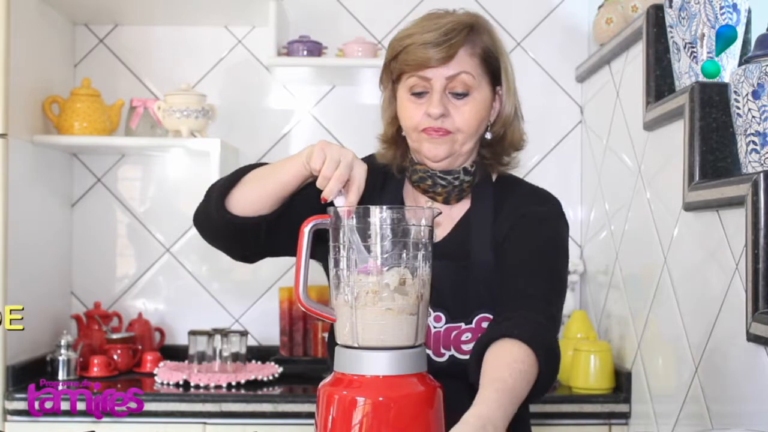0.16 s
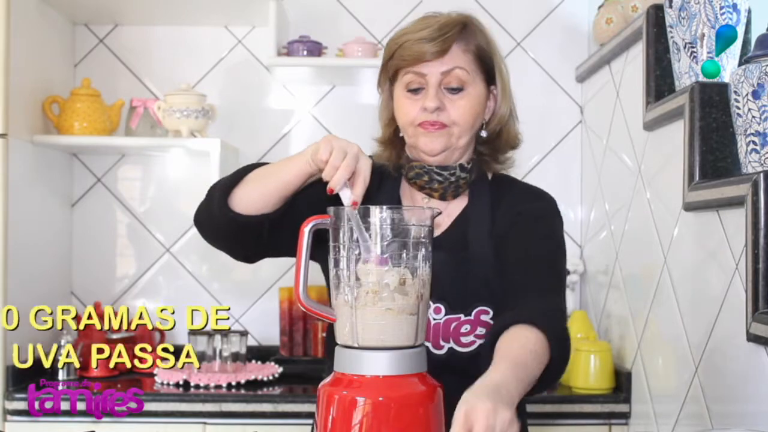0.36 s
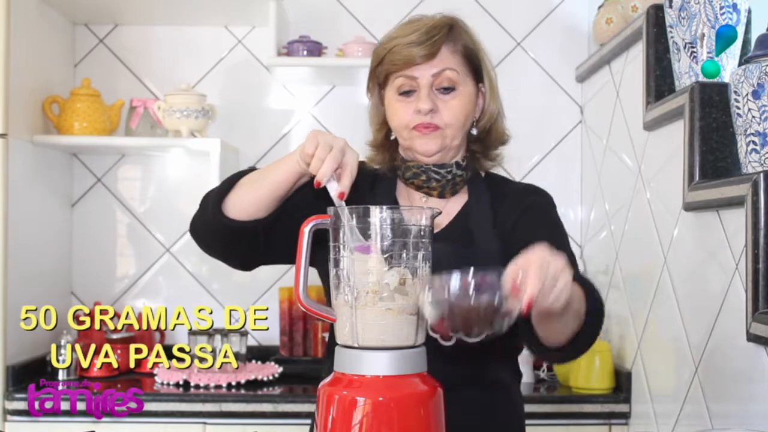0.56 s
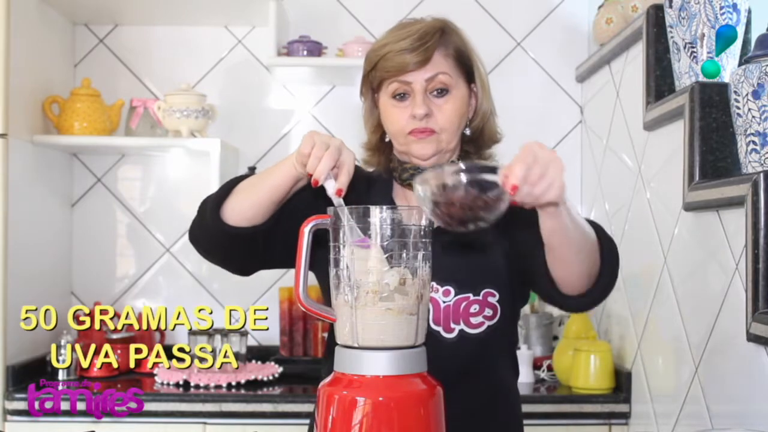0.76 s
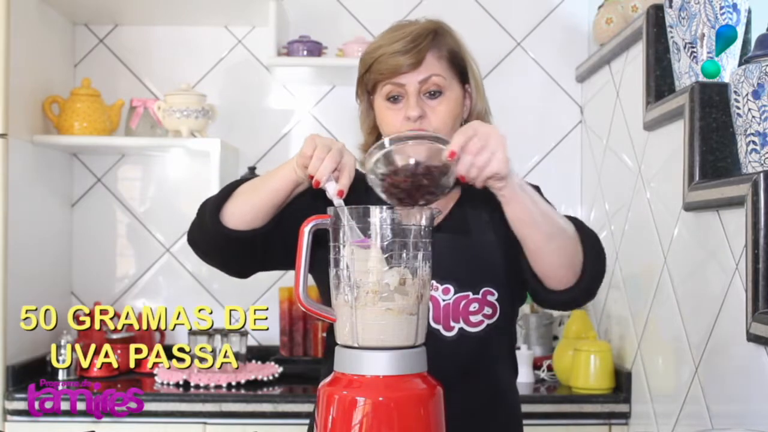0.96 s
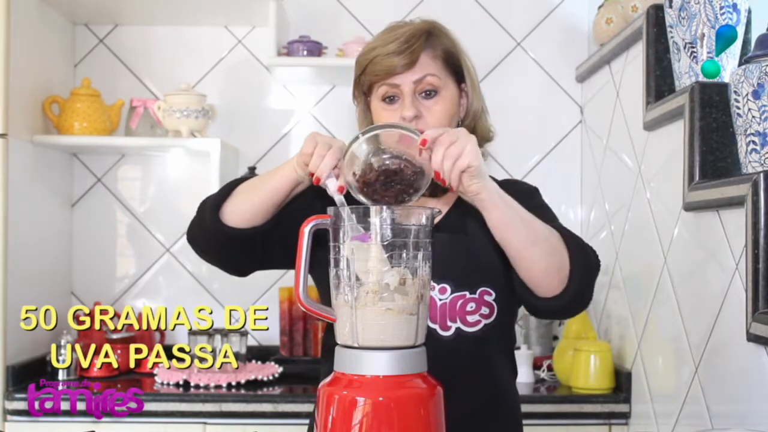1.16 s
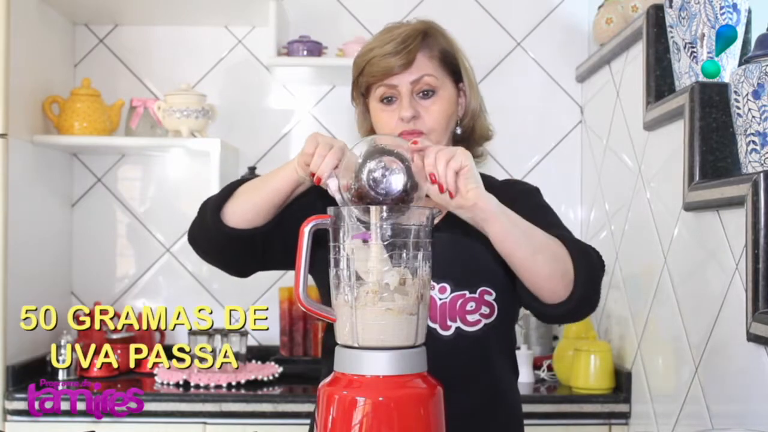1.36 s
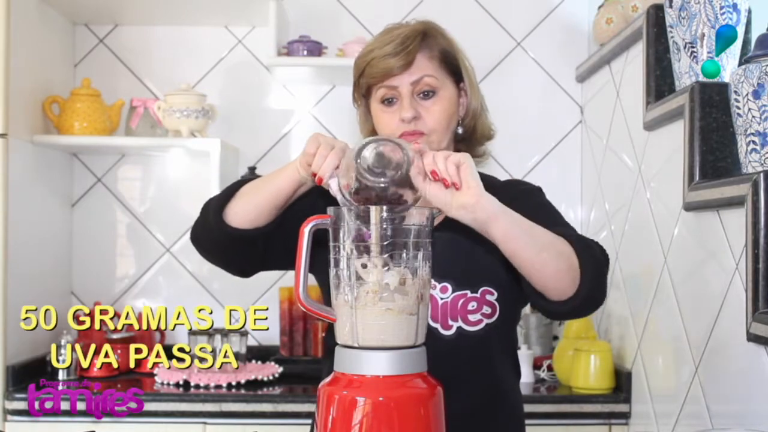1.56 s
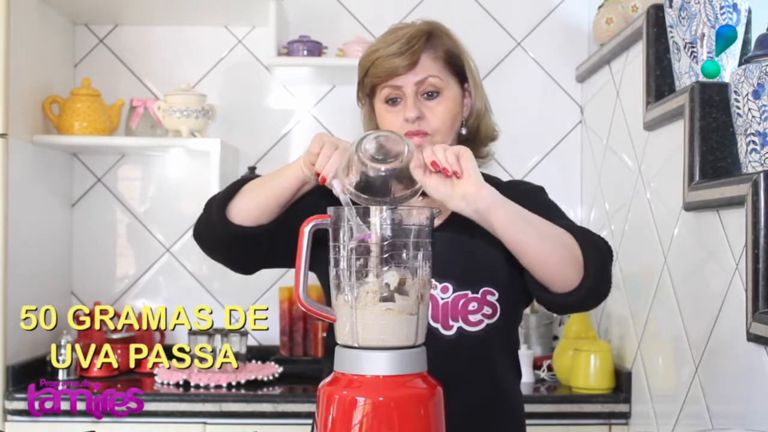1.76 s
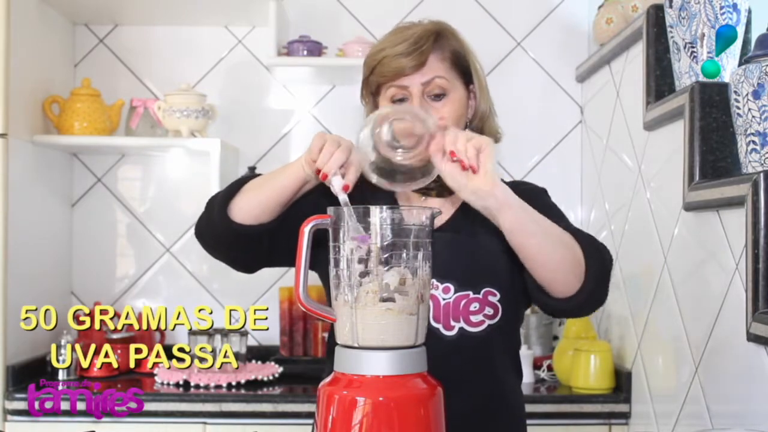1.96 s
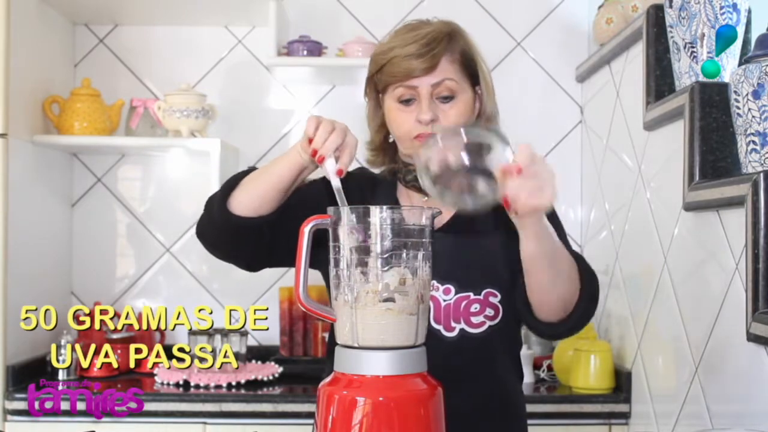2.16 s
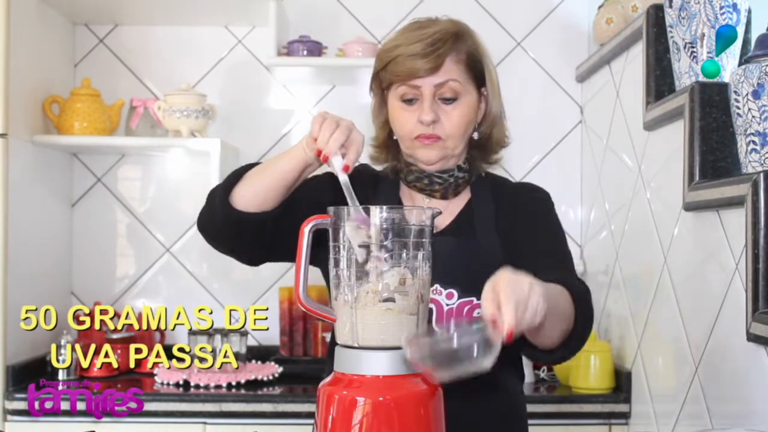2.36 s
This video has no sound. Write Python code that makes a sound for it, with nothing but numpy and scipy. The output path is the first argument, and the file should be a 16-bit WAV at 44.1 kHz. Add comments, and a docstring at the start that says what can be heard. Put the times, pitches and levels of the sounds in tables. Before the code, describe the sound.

A small glass bowl scrapes off a stone counter, then thick batter is stirred.

```python
"""A tiled kitchen, one microphone close to a stone counter, quiet room noise throughout.
A hand brushes faintly; at 0.2 s a small glass bowl is dragged off the counter, its slipping foot
ringing the glass, and at 0.6 s it clinks once in the hand. From 1 s a spatula scrapes down a plastic
blender jar and thick batter flops inside with hollow thuds; now and then a falling raisin or the
spatula ticks against the jar. The batter is stirred softly, and at 1.8 s the jar rocks once."""
import sys
import numpy as np
from scipy import signal
from scipy.fft import rfft, irfft, next_fast_len
from scipy.io import wavfile
from scipy.ndimage import uniform_filter1d

SR = 44100
rng = np.random.default_rng(int(sys.argv[2]) if len(sys.argv) > 2 else 0)


def pcm_store(signal):
    """Save signal as 16-bit PCM."""
    levels = np.round(np.clip(np.atleast_2d(signal), -1, 1) * 32767)
    wavfile.write(sys.argv[1], SR, levels.astype(np.int16).T)


N = 105840
TIME = np.arange(N) / SR
HIT_SAMPLES = 441  # 10 ms


# how hard the bowl rubs on the counter: (time [s], level [dB])
DRAG_LEVEL = [(.215, -79), (.223, -31.5), (.236, -22.5), (.246, -11), (.274, -15.5), (.288, -13),
              (.315, -18), (.355, -25), (.385, -31), (.408, -28.5), (.426, -34), (.445, -56.5)]
# resonances of the bowl on the stone: (frequency [Hz], width [Hz], level [dB])
BOWL_MODES = [(569, 50, -7), (673, 35, 0), (828, 20, -0.5), (930, 62, -3), (1127, 35, -3.5), (1303, 39, -3),
              (1420, 76, -0.5), (1603, 46, 2), (2026, 45, -1.5), (2540, 34, -7.5), (2824, 8, -7.5),
              (3060, 60, -16.5), (3940, 230, -18.5)]
# friction of glass on stone: (frequency [Hz], density [dB])
FRICTION_SPECTRUM = [(100, -35.5), (250, -20.5), (550, 2), (1600, -1), (2400, -1.5), (3300, -11.5),
                     (4500, -22.5), (5700, -31.5), (7200, -48), (15000, -56)]
# dull rumble of the counter: (frequency [Hz], density [dB])
COUNTER_SPECTRUM = [(90, -20), (140, -5.5), (240, 4), (420, 2), (1500, -45)]
# the bowl's foot catches: (time [s], level [dB], pitch [Hz], t60 [s])
FOOT_CATCHES = [(.2175, -35.5, 2010, 0.031), (.2242, -30.5, 1760, 0.0063), (.2822, -20, 2230, 0.0081),
                (.2855, -19, 1990, 0.0039), (0.359, -23, 1387, .04)]
SLIPS_PER_S, SLIP_SPREAD_DB = 2200, -1

def bowl_drag():
    """Dense slips of the foot ring the glass and shake the counter; a few catches stand out."""
    force, rub = (grains(SLIPS_PER_S, SLIP_SPREAD_DB) * stroke(DRAG_LEVEL) for _ in range(2))
    glass = from_db(-2.5) * driven(resonate, force, BOWL_MODES)
    friction = from_db(-6.5) * driven(coloured, rub, FRICTION_SPECTRUM)
    counter = from_db(-20.5) * delayed(driven(coloured, force, COUNTER_SPECTRUM), .012)
    catches = sum(from_db(db) * delayed(ping(hz, t60, attack_s=.00034), s)
                  for s, db, hz, t60 in FOOT_CATCHES)
    return filtered(glass + friction + catches + counter, "low", hz=5530, order=4)


# gritty treble of the drag: (time [s], level [dB])
GRIT_LEVEL = [(.22, -92), (.226, -52), (.232, -49.5), (.236, -33), (.255, -34), (.272, -49), (.315, -49.5),
              (.345, -72)]
# upper resonances of the glass: (frequency [Hz], width [Hz], level [dB])
GLASS_MODES = [(3600, 550, 1.5), (4620, 780, -2), (10190, 400, 2), (13300, 300, -12.5), (15290, 200, -4)]
# thin squeals of the foot: (time [s], length [s], level [dB])
FOOT_SQUEALS = [(0.256, .046, -43), (0.318, 0.037, -51.5)]

def bowl_grit():
    """Grit under the foot rasps in the upper resonances of the glass, with two thin squeals."""
    force = grains(SLIPS_PER_S, SLIP_SPREAD_DB) * stroke(GRIT_LEVEL)
    rasp = driven(resonate, force, GLASS_MODES)
    squeal_gain = sum(from_db(db) * swell(s, length) for s, length, db in FOOT_SQUEALS)
    return rasp + squeal_gain * narrow_noise(hz=6310, width_hz=230)


# how hard the batter is stirred: (time [s], level [dB])
STIR_LEVEL = [(1.015, -74), (1.035, -23), (1.09, -20), (1.24, -37.5), (1.3, -44), (1.5, -61.5),
              (1.67, -58.5), (1.75, -49), (1.86, -53.5), (1.98, -62)]
# wet squelch of the batter: (frequency [Hz], density [dB])
SQUELCH_SPECTRUM = [(90, -32.5), (200, -3), (400, 5), (570, -2.5), (760, -13), (2000, -31.5), (9000, -85)]
# low modes of the filled jar: (frequency [Hz], t60 [s], level [dB])
JAR_MODES = [(165, 0.12, 1), (242.1, 0.26, 6), (346.6, 0.31, -4), (387, 0.12, 0.5), (468.6, .08, 1.5),
             (549.7, .16, 2.5), (638, .12, -2.5)]
# lumps flop in the jar: (time [s], level [dB], pitch [Hz])
BATTER_THUDS = [(1.027, -29.5, 553), (1.035, -22.5, 238), (1.0475, -23, 572), (1.057, -19.5, 521),
                (1.072, -14.5, 259), (1.109, -16.5, 262), (1.159, -27.5, 227), (1.184, -24.5, 256),
                (1.207, -25.5, 232), (1.2204, -22.5, 484), (1.222, -25.5, 261), (1.2334, -28, 346),
                (1.263, -34, 400), (1.3302, -28.5, 391), (1.343, -31, 313), (1.778, -45.5, 436),
                (1.8123, -38, 466), (1.838, -43, 412)]

def batter():
    """Each lump plops at its own pitch and wakes the jar's low modes; small squelches ring it too."""
    force = grains(per_s=380, spread_db=-1.5) * stroke(STIR_LEVEL)
    stirred_jar = rms_one(signal.fftconvolve(force, struck(JAR_MODES))[:N])
    ringing = from_db(-5.5) * np.std(force) * stirred_jar
    for s, db, hz in BATTER_THUDS:
        plop = ping(hz, t60=.052, attack_s=.0016)
        hollow = struck(JAR_MODES, extra_db=-10 * (octaves_from(hz, JAR_MODES) / .8) ** 2)
        ringing = ringing + from_db(db) * delayed(plop + from_db(-5.5) * hollow, s)
    squelch = from_db(-4.5) * driven(coloured, force, SQUELCH_SPECTRUM)
    return filtered(ringing, "band", hz=[170, 700], order=4) + squelch


# the spatula's stroke down the wall: (time [s], level [dB])
SWEEP_LEVEL = [(1.015, -86), (1.02, -36.5), (1.036, -27), (1.053, -24), (1.08, -29.5), (1.096, -34),
               (1.105, -42), (1.2, -56.5)]
# batter smeared on plastic: (frequency [Hz], density [dB])
SMEAR_SPECTRUM = [(150, -23), (400, -10), (620, 9), (800, -5), (1250, -9.5), (1550, -1), (1750, -11.5),
                  (2400, -7.5), (3200, -13.5), (5500, -17), (9000, -23), (13000, -29), (16000, -54)]
# thin singing of the scraped wall: (frequency [Hz], width [Hz], level [dB])
WALL_SONG_MODES = [(920, 7.5, 0), (5520, 8.7, -4), (5600, 8.3, 0), (5840, 14, 1)]

def spatula_sweep():
    """Fine wet crackle as the blade smears batter down the wall, which rings on thinly."""
    force = grains(per_s=5400, spread_db=2) * stroke(SWEEP_LEVEL)
    smear = driven(coloured, force, SMEAR_SPECTRUM)
    return smear + from_db(-23.5) * driven(resonate, force, WALL_SONG_MODES)


# a falling raisin or the spatula ticks against the jar:
# (time [s], level [dB], favoured frequency [Hz], emphasis [dB])
JAR_TICKS = [(.996, -44, 4080, 7.5), (1.22, -42.5, 1500, 23), (1.3296, -45, 1650, 8),
             (1.7128, -61.5, 2400, 7), (1.8104, -48.5, 9800, 14), (1.8408, -53, 3730, 19)]
# modes of the plastic wall: (frequency [Hz], t60 [s], level [dB])
WALL_MODES = [(1030, .035, -6), (1575, 0.044, 1.5), (2316, 0.022, -1), (3837, 0.019, -0.5),
              (4190, 0.04, -8.5), (5710, .02, -6.5), (6630, .012, 0.5), (7800, 0.011, -4),
              (10050, .022, -4.5)]

def jar_ticks():
    """Each hit is a crack plus the wall's modes; the stronger the emphasis, the purer the tick."""
    ticks = 0
    for s, db, hz, emphasis_db in JAR_TICKS:
        nearness = np.exp(-(octaves_from(hz, WALL_MODES) / .53) ** 2)
        tick = struck(WALL_MODES, emphasis_db * nearness) + from_db(-emphasis_db / 2) * crack()
        ticks = ticks + from_db(db) * delayed(tick, s)
    return ticks


# modes of the lifted bowl: (frequency [Hz], t60 [s], level [dB])
CLINK_MODES = [(626, .05, -6.5), (1005, 0.05, -4), (3170, 0.034, -1.5), (5530, 0.023, 1),
               (6780, 0.0098, -1)]

def bowl_clink():
    """A light touch of the lifted bowl, close to the microphone: bright pings over duller notes."""
    clink = struck(CLINK_MODES) + from_db(-1.5) * crack()
    return from_db(-37) * delayed(clink, .6155)


# contact noise in the ticks and the clink: (frequency [Hz], density [dB])
CRACK_SPECTRUM = [(200, -1.5), (600, 16), (6500, 6.5), (16000, -26)]

def crack():
    """The short noise of a hard contact."""
    return hit_one(coloured(rng.standard_normal(N) * dying(t60=.038), CRACK_SPECTRUM))


def jar_bump():
    """One low, soft note as the jar rocks on its base."""
    note = hit_one(TIME * dying(t60=.1) * sine(hz=121))
    return from_db(-45.5) * delayed(note, 1.822)


# the hand moves: (time [s], length [s], level [dB], centre [Hz])
HAND_BRUSHES = [(-.05, .32, -62, 1330)]

def hand_brush():
    """A faint swell of soft rubbing from the hand."""
    return sum(from_db(db) * swell(s, length) * narrow_noise(hz, width_hz=510)
               for s, length, db, hz in HAND_BRUSHES)


# decay of the tiled kitchen: (frequency [Hz], t60 [s])
KITCHEN_T60 = [(100, .6), (1000, 0.5), (2500, 0.56), (5000, 0.12), (12000, .17)]

def kitchen_echo(x):
    """Diffuse echo off the tiles, 6 ms late at the microphone; each octave dies at its own rate."""
    edges_hz, tail = np.geomspace(62, 16000, 9), 0
    for low, high in zip(edges_hz, edges_hz[1:]):
        band = filtered(rng.standard_normal(N), "band", hz=[low, high], order=2)
        tail = tail + band * dying(at_hz(KITCHEN_T60, np.sqrt(low * high)))
    gain = np.sqrt(2 * np.log(1000) / (SR * at_hz(KITCHEN_T60, 1000)))  # about unity at 1 kHz
    return signal.fftconvolve(x, gain * delayed(tail, .006))[:N]


# low noise of the kitchen: (frequency [Hz], density [dB])
ROOM_SPECTRUM = [(65, -23), (100, -4.5), (210, 0.5), (350, 3.5), (600, -5), (800, -9), (3000, -23.5),
                 (8000, -44)]
# its slow drift: (time [s], level [dB])
ROOM_LEVEL = [(0, -60.5), (.75, -55.5), (.95, -62), (1.5, -59), (2.4, -63)]
# faint hiss: (frequency [Hz], density [dB])
HISS_SPECTRUM = [(2500, 0), (5000, -1), (10000, -4), (16000, -10.5)]
# its slow drift: (time [s], level [dB])
HISS_DRIFT = [(0, -70), (.68, -63), (.93, -67.5), (1.15, -61.5), (2.4, -70)]

def room_tone():
    """Low room noise in the centre and a wider hiss that swells and sinks."""
    room = level(ROOM_LEVEL) * coloured(rng.standard_normal(N), ROOM_SPECTRUM)
    mid, side = (coloured(rng.standard_normal(N), HISS_SPECTRUM) for _ in range(2))
    return room + level(HISS_DRIFT) * (mid + from_db(-1.5) * side * [[1], [-1]])


def from_db(db):
    """Decibels to gain."""
    return 10 ** (np.asarray(db) / 20)


def rms_one(x):
    """Scale to rms 1."""
    return x / np.sqrt(np.mean(x ** 2) + 1e-20)


def hit_one(x):
    """Scale a blow to the energy of 10 ms at rms 1."""
    return x * np.sqrt(HIT_SAMPLES / (np.sum(x ** 2) + 1e-20))


def level(rows):
    """Gain over time from (time [s], level [dB]) points."""
    return from_db(np.interp(TIME, *np.transpose(rows)))


def stroke(rows):
    """Gain over time for one movement, silent outside it."""
    return from_db(np.interp(TIME, *np.transpose(rows), left=-200, right=-200))


def swell(s, length):
    """One smooth rise and fall."""
    return np.sin(np.pi * np.clip((TIME - s) / length, 0, 1))


def dying(t60):
    """Exponential decay, 60 dB down after t60 seconds."""
    return np.exp(-np.minimum(np.log(1000) * TIME / t60, 60))


def delayed(x, s):
    """Start a sound s seconds later."""
    return np.concatenate([np.zeros(int(s * SR)), x])[:N]


def at_hz(points, hz):
    """Read a table on a log-frequency axis."""
    points_hz, values = np.transpose(points)
    return np.interp(np.log(hz), np.log(points_hz), values)


def octaves_from(hz, modes):
    """How many octaves each mode lies above hz."""
    return np.log2(np.array(modes)[:, 0] / hz)


def sine(hz):
    """A steady tone."""
    return np.sin(2 * np.pi * hz * TIME)


def ping(hz, t60, attack_s):
    """One note that rises quickly and dies away."""
    attack = 1 - np.exp(-TIME / attack_s)
    return hit_one(attack * dying(t60) * sine(hz))


def struck(modes, extra_db=0):
    """A blow rings each mode as a decaying sine; extra_db shifts their balance."""
    modes_hz, t60s, dbs = np.transpose(modes)
    gains = from_db(dbs + extra_db)
    return hit_one(sum(gain * dying(t60) * sine(hz) for hz, t60, gain in zip(modes_hz, t60s, gains)))


def grains(per_s, spread_db):
    """Random tiny impacts of uneven size, evened over 10 ms so that the force stays steady."""
    sizes = from_db(spread_db * np.minimum(rng.exponential(1, N), 4)) * rng.choice([-1, 1], N)
    clicks = sizes * (rng.random(N) < per_s / SR)
    power = uniform_filter1d(clicks ** 2, size=HIT_SAMPLES)
    return rms_one(clicks / np.sqrt(power + power.mean() / 10))


def filtered(x, kind, hz, order):
    """A low-, high- or band-pass with a flat passband."""
    return signal.sosfilt(signal.butter(order, hz, kind, fs=SR, output="sos"), x)


def coloured(x, spectrum):
    """Causal (minimum-phase) filter with the given spectrum; rms 1."""
    size = 2 * next_fast_len(N * 2 // 3)
    bins_hz = np.arange(size // 2 + 1) * SR / size + 1
    cepstrum = irfft(np.log(from_db(at_hz(spectrum, bins_hz))))
    cepstrum[1:size // 2] *= 2
    cepstrum[size // 2 + 1:] = 0
    return rms_one(irfft(rfft(x, size) * np.exp(rfft(cepstrum)))[:N])


def resonate(x, resonances):
    """Parallel resonances of alternating sign; rms 1."""
    total = 0
    for k, (hz, width_hz, db) in enumerate(resonances):
        radius = np.exp(-np.pi * width_hz / SR)
        feedback = [1, -2 * radius * np.cos(2 * np.pi * hz / SR), radius ** 2]
        ring = (1 - radius ** 2) * signal.lfilter([1, 0, -1], feedback, x + 1e-18)
        total = total + (-1) ** k * from_db(db) * ring
    return rms_one(total)


def narrow_noise(hz, width_hz):
    """Noise twice through one resonance; rms 1."""
    resonance = [(hz, width_hz, 0)]
    return resonate(resonate(rng.standard_normal(N), resonance), resonance)


def driven(body, force, table):
    """Send a force through a body, keeping its overall level."""
    return body(force, table) * np.std(force)


def scene():
    """Bowl and jar centred at the microphone, with their share of echo; the close clink stays dry."""
    # (sound, echo send [dB])
    sources = [(bowl_drag(), -12), (bowl_grit(), -4), (jar_ticks(), -9.5),
               (spatula_sweep(), -8.5), (batter() + jar_bump(), -15)]
    direct = sum(sound for sound, _ in sources)
    echo = kitchen_echo(sum(sound * from_db(send_db) for sound, send_db in sources))
    return direct + echo + bowl_clink() + hand_brush() + room_tone()


def record(dry):
    """The microphone sheds the deep bass; the highest peaks are rounded; the top is cut at 16 kHz."""
    thin = filtered(dry, "high", hz=79, order=3)
    rounded = thin / (1 + (thin / .9) ** 4) ** .25
    return signal.sosfilt(signal.ellip(10, .1, 80, 16000, fs=SR, output="sos"), rounded)


dry = scene()
out = record(dry)
pcm_store(out)
```